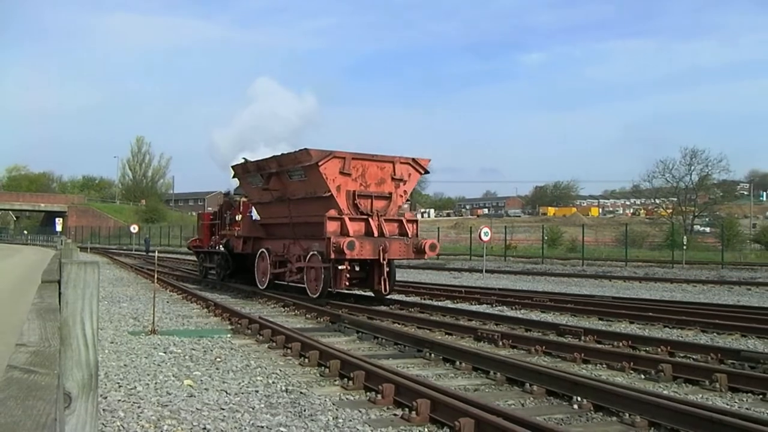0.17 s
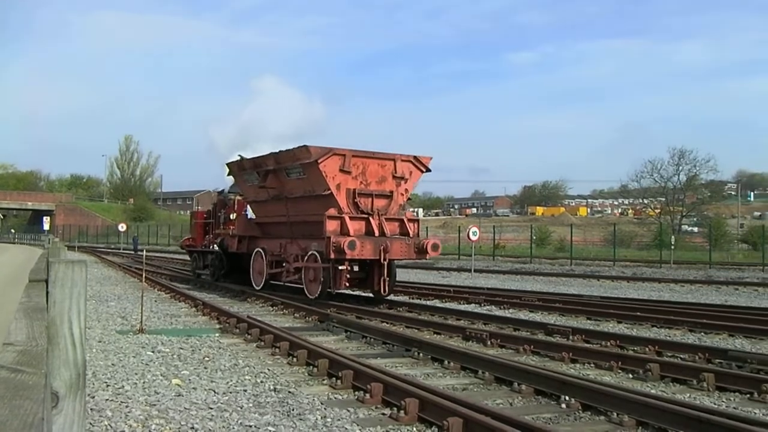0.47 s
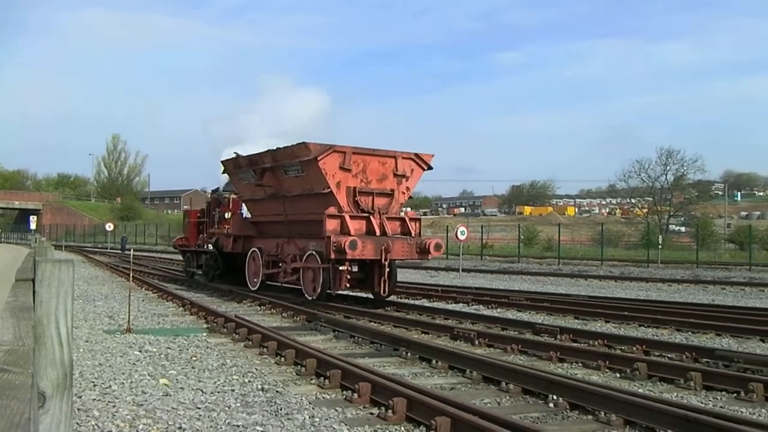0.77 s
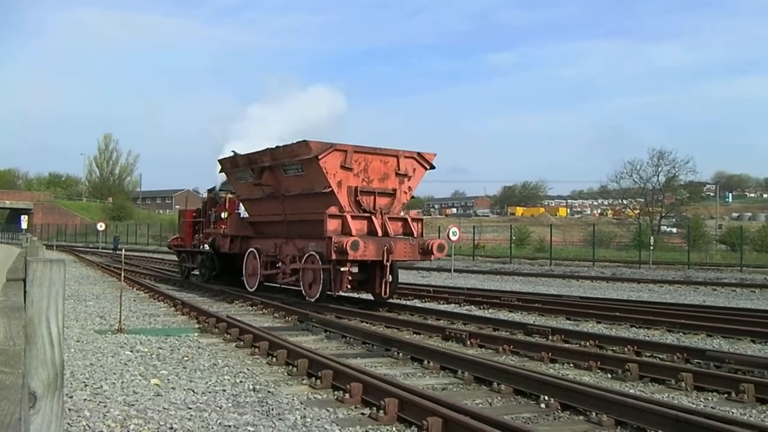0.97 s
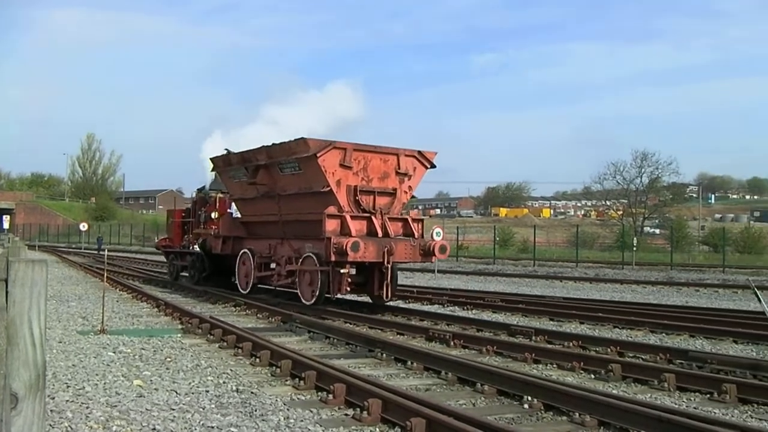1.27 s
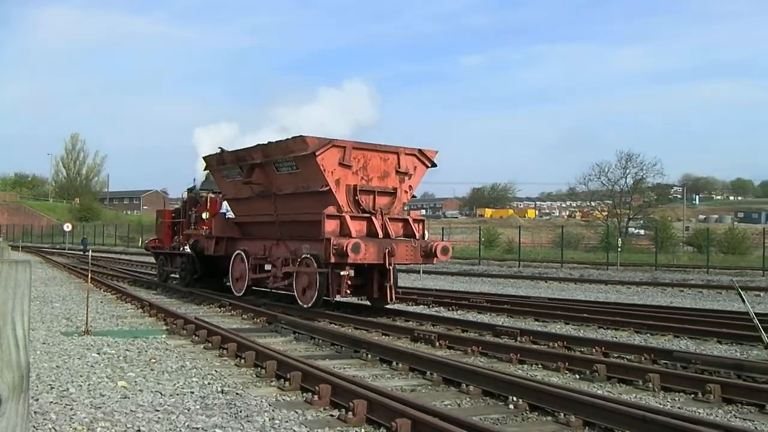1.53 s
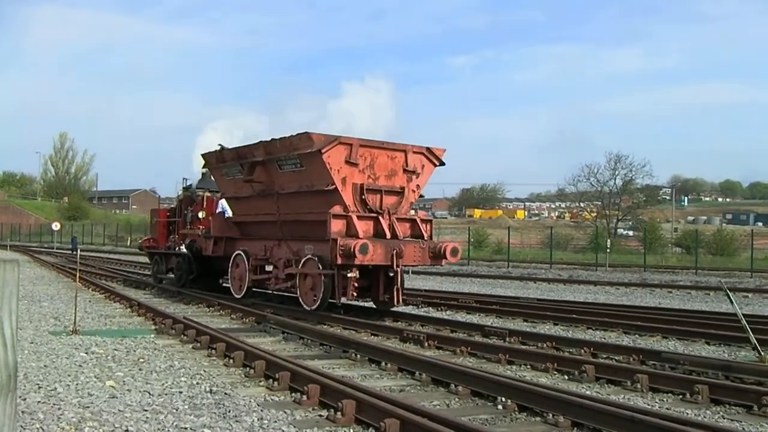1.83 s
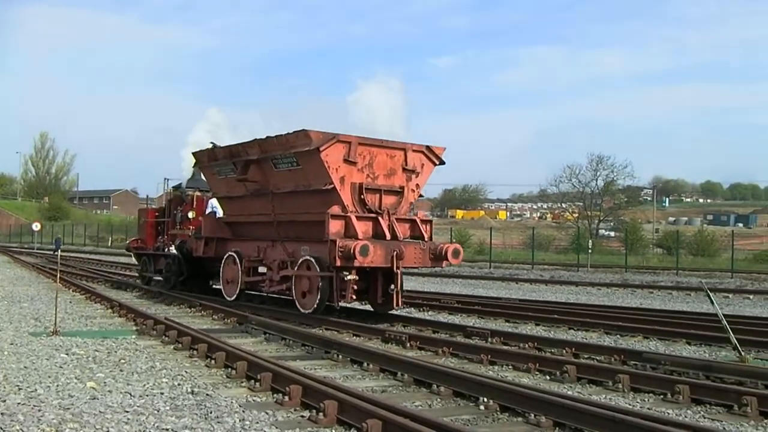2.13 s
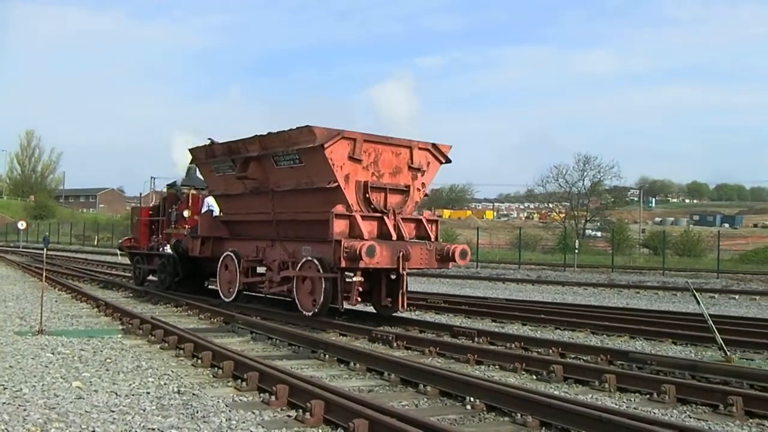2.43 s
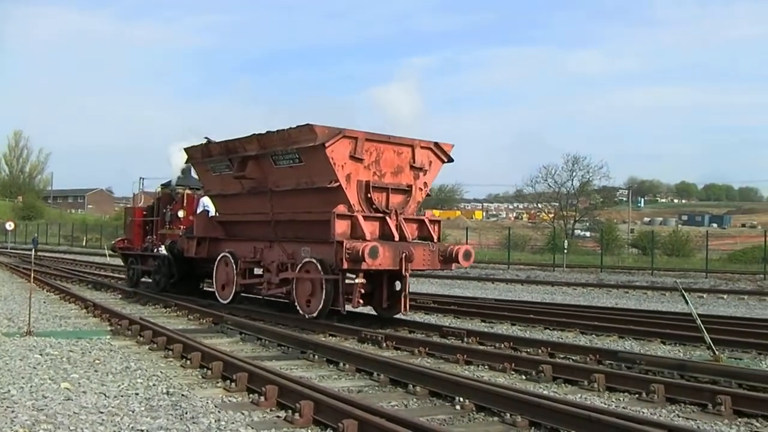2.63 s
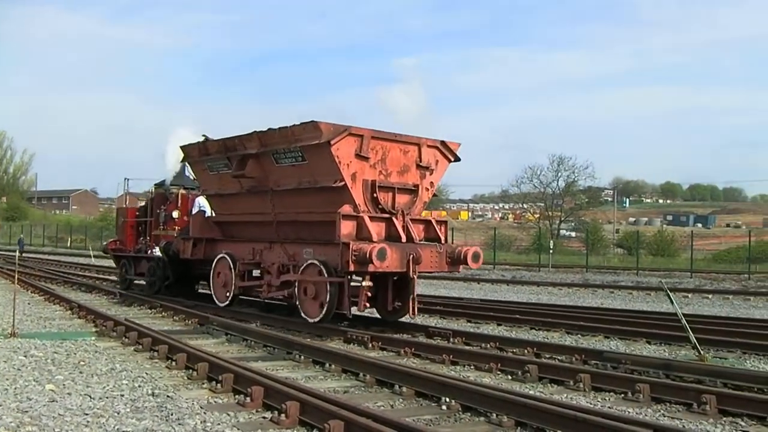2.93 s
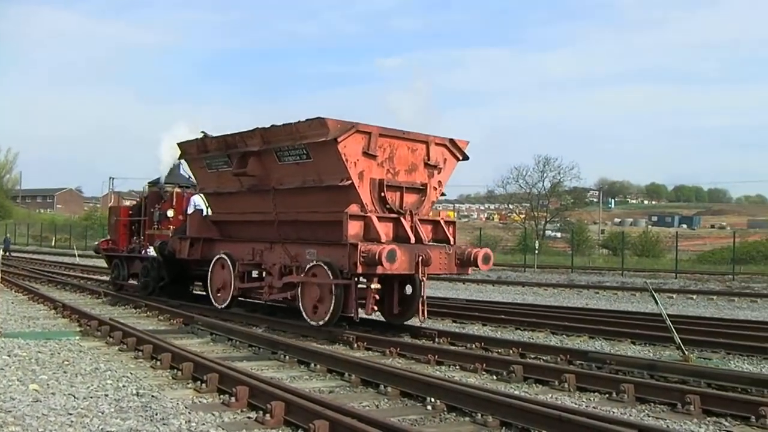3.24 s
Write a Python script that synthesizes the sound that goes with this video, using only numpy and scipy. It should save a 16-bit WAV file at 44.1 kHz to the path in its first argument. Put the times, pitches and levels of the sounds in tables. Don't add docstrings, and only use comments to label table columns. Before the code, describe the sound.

A small steam locomotive hisses throughout, a crisp high jet over a breathy, slightly whistling leak. The jet starts restrained, surges around 1.1-1.3 and 1.6-1.9 seconds, eases, then lifts near 2.7 and at the end. Beneath, wagon wheels rumble softly, with dull, quickly damped metal knocks near 0.5, 0.8, 1.2, 2.1-2.3 and 3.1-3.3. Open yard, close stereo; a faint early breeze fades after 1.2.

```python
import sys
import numpy as np
from scipy import signal
from scipy.fft import rfft, irfft
from scipy.io import wavfile
from scipy.ndimage import uniform_filter1d

SR = 44100
rng = np.random.default_rng(int(sys.argv[2]) if len(sys.argv) > 2 else 0)


def unload_audio(sound):
    columns = np.transpose(np.atleast_2d(sound))
    steps = np.round(np.clip(columns, -1, 1) * 32767)
    wavfile.write(sys.argv[1], SR, steps.astype(np.int16))


def invert_db(x):
    u = np.asarray(x, float) / 20
    return 10 ** u


N = 149940
HZ = np.maximum(np.arange(N // 2 + 1) * SR / N, 1)
RIDGE_WIDTH_HZ = 383


def rms_one(x):
    return x / np.sqrt(np.mean(x ** 2) + 1e-20)


def in_time(rows):
    s, *columns = np.transpose(rows)
    return [np.interp(np.arange(N) / SR, s, c) for c in columns]


def at_hz(points):
    hz, *columns = np.transpose(points)
    return [np.interp(np.log(HZ), np.log(hz), c) for c in columns]


def noise_pair():
    return rng.standard_normal((2, N))


def drift(rate_hz):
    step, settle = 40, 2000
    r = np.exp(-2 * np.pi * rate_hz * step / SR)
    chance = rng.standard_normal(N // step + settle + 2)
    slow = signal.lfilter([1], [1, -2 * r, r * r], chance)[settle:]
    return np.interp(np.arange(N) / step, np.arange(len(slow)), rms_one(slow))


def resonate(x, hz, width_hz):
    r = np.exp(-np.pi * width_hz / SR)
    poles = [1, -2 * r * np.cos(2 * np.pi * hz / SR), r * r]
    for _ in range(2):
        x = signal.lfilter([1, 0, -1], poles, x)
    return rms_one(x)


def turbulence(colour, together_db, patchy_db, rate, count):
    low, high = colour[0][0], colour[-1][0]
    place = (count - 1) * np.log(HZ / low) / np.log(high / low)
    spectrum = rfft(noise_pair()) * invert_db(at_hz(colour)[0])
    shared_db = together_db * (drift(2.5) + drift(26))
    total = np.zeros((2, N))
    for k in range(count):
        band = irfft(spectrum * np.clip(1 - abs(place - k), 0, 1), N)
        own_db = patchy_db * (drift(rate) + drift(rate / 5))
        total += invert_db(shared_db + own_db) * band
    return rms_one(total)


def ridge(hz, width_hz):
    low_pass = signal.butter(4, width_hz / 2, fs=SR, output="sos")
    slow = signal.sosfilt(low_pass, rng.standard_normal((2, 2, N)))
    turn = 2 * np.pi * np.cumsum(hz) / SR
    band = slow[0] * np.cos(turn) + slow[1] * np.sin(turn)
    return rms_one(band) * invert_db(0.52 * drift(11.0))


# time in seconds, jet level in dB, brightness at the top in dB.
VALVE_PRESSURE = [(0.0, -30.5, -6), (0.14, -34.5, -6), (0.25, -31.5, -4), (0.43, -29.5, -3),
                  (0.69, -32, -3), (0.89, -33.5, -6), (1.11, -25, -5), (1.32, -22.5, -9), (1.36, -27.5, -8),
                  (1.5, -28.5, -8), (1.57, -22, -6.5), (1.92, -22.5, -11), (2.08, -29.5, -2),
                  (2.57, -26.5, -7), (2.67, -24, -9), (2.9, -27.5, -2.5), (3.08, -28.5, -7.5),
                  (3.4, -23, -5.5)]
# frequency in Hz, spectral density in dB per Hz.
JET_COLOUR = [(5000, -22), (7400, -12.5), (8300, -4.5), (9100, -0.5), (9700, 0.5), (10800, 0),
              (12200, -3.5), (13600, -11)]
# frequency in Hz, spectral density in dB per Hz.
FIZZ_COLOUR = [(11800, -16), (13400, -7), (14200, 0), (15000, -2), (15800, -2), (18000, -2.5)]
# starting frequency in Hz, level relative to the jet in dB.
JET_BANDS = [(9250, -14), (10400, -12.5), (11200, -10.5)]


def valve():
    db, top_db = in_time(VALVE_PRESSURE)
    sink = 1 - 0.04 * np.arange(N) / N
    jet = turbulence(JET_COLOUR, together_db=0.72, patchy_db=1.0, rate=17.0, count=9)
    for hz, under_db in JET_BANDS:
        jet += invert_db(under_db + 3.8 * drift(1.1)) * ridge(hz * sink, RIDGE_WIDTH_HZ)
    fizz = turbulence(FIZZ_COLOUR, together_db=-0.15, patchy_db=1.4, rate=12, count=4)
    return invert_db(db + 1.0) * (jet + invert_db(top_db + 4.5) * fizz)


# time in seconds, level in dB, upper ridge in Hz, then the levels
# of the upper, lower, middle and top ridges in dB over the leak.
LEAK_FLOW = [(0, -31.5, 3944, -12, -12, -11, -26), (.3, -31, 4000, -16, -9, -9.5, -20),
             (.5, -32, 4000, -11, -13, -21, -20), (.68, -30.5, 4030, -8, -7, -17, -24),
             (.95, -31, 4060, -8, -8, -18, -29), (1.25, -28, 4037, -3, -7, -10, -7),
             (1.45, -29, 4010, -2, -7, -13, -11), (1.6, -26.5, 4030, -6.5, -8.5, -9, -16),
             (1.72, -31.5, 4020, -3, -6.5, -13, -11), (1.95, -30, 4010, -3.5, -3, -13, -20),
             (2.3, -29.5, 3960, -6.5, -5.5, -16, -26), (2.6, -30.5, 3925, -5, -4, -5.5, -11),
             (2.82, -28, 3886, -3, -3, -7, -11), (3.04, -28.5, 3794, -12, -3, -13, -21),
             (3.25, -28, 3755, -8, -5.5, -9.5, -6.5), (3.4, -26.5, 3756, -11, -10, -7, -7)]
# frequency in Hz, spectral density in dB per Hz.
LEAK_COLOUR = [(900, -16), (1500, -6), (2200, -3), (3200, -4.5), (4400, -5.5), (5200, -5), (6200, -3),
               (7600, -11.5)]


def leak():
    db, upper_hz, upper_db, lower_db, middle_db, top_db = in_time(LEAK_FLOW)
    lower_hz = 2731 * (upper_hz / upper_hz[0]) ** 0.6
    still = np.ones(N)
    hiss = turbulence(LEAK_COLOUR, together_db=0.44, patchy_db=0.5, rate=8.2, count=9)
    hiss += invert_db(upper_db) * ridge(upper_hz, RIDGE_WIDTH_HZ)
    hiss += invert_db(lower_db) * ridge(lower_hz, width_hz=496)
    hiss += invert_db(middle_db) * ridge(3500 * still, width_hz=300)
    hiss += invert_db(top_db) * ridge(4454 * still, RIDGE_WIDTH_HZ)
    return invert_db(db) * hiss


# time in seconds, level in dB, low hum over that level in dB.
ROLLING_LEVEL = [(0.0, -41, -6), (0.25, -42.5, -5.5), (0.45, -42, -8), (0.52, -38, 0), (0.62, -39, -8),
                 (0.74, -39, -6), (0.86, -43.5, 1), (1.05, -42, -4), (1.25, -41, -7), (1.5, -40, -12),
                 (1.72, -44.5, -11), (1.88, -43, -6), (2.05, -42, -5), (2.25, -37.5, -8.5),
                 (2.62, -42.5, -14), (2.75, -41.5, -0.5), (3.2, -40.5, -9.5), (3.4, -38.5, -8)]
# frequency in Hz, spectral density in dB per Hz.
RUMBLE_COLOUR = [(15, -45), (35, -32), (56, -7), (91, 0), (247, -7.5), (370, -2.5), (501, -5), (613, -2.5),
                 (817, -6), (1400, -13), (1820, -38), (3080, -120)]
# frequency in Hz, width in Hz, level over the rumble in dB.
BODY_MODES = [
    (370, 56, -10.5),
    (700, 110, -22),
]


def rolling():
    db, low_db = in_time(ROLLING_LEVEL)
    sound = turbulence(RUMBLE_COLOUR, together_db=0.44, patchy_db=0.27, rate=7.8, count=8)
    for hz, width_hz, mode_db in BODY_MODES:
        sound += invert_db(mode_db + 2.5 * drift(9.4)) * resonate(noise_pair(), hz, width_hz)
    sound += invert_db(low_db) * resonate(noise_pair(), hz=86, width_hz=24)
    return invert_db(db) * sound


# time in seconds, level in dB.
BREEZE_LEVEL = [
    (0, -55),
    (.3, -56),
    (.6, -54),
    (1.15, -52),
    (1.3, -71),
    (2.7, -66),
    (3.4, -58),
]


def breeze():
    db, = in_time(BREEZE_LEVEL)
    band = signal.butter(4, [40, 62], "band", fs=SR, output="sos")
    both, own = signal.sosfilt(band, noise_pair())
    return invert_db(db + 2.5 * drift(5.0)) * rms_one(both + 0.3 * own * [[1], [-1]])


# time in seconds, level in dB.
SCATTER_LEVEL = [
    (0, -54),
    (1.0, -52),
    (1.7, -60),
    (2.1, -68),
    (3.4, -68),
]


def scatter():
    db, = in_time(SCATTER_LEVEL)
    band = signal.butter(2, [5400, 6800], "band", fs=SR, output="sos")
    return invert_db(db + 3.0 * drift(6.0)) * rms_one(signal.sosfilt(band, noise_pair()))


def burst(t, length, tail):
    return np.clip(t / 0.0025, 0, 1) * np.exp(-np.maximum(t - length, 0) / tail)


# start in seconds, level in dB, top frequency in Hz, length in seconds.
JOINT_KNOCKS = [(0.486, -34.5, 1700, 0.033), (.668, -36.5, 1100, 0.03), (0.798, -33, 2000, 0.044),
                (1.162, -30.5, 1390, 0.039), (2.069, -35, 1200, 0.051), (2.172, -32.5, 700, 0.043),
                (2.284, -33, 1300, 0.018), (2.702, -35.5, 1502, 0.031), (2.882, -34, 1700, 0.014),
                (3.14, -31, 1800, 0.014), (3.325, -37.5, 899, 0.039)]


def joint_knocks():
    t, out = np.arange(SR // 5) / SR, np.zeros((2, N + SR))
    for s, db, top_hz, length in JOINT_KNOCKS:
        band = signal.butter(1, [170, top_hz], "band", fs=SR, output="sos")
        shudder = rms_one(signal.sosfilt(band, rng.standard_normal((2, len(t)))))
        start = int(s * SR)
        out[:, start:start + len(t)] += invert_db(db) * shudder * burst(t, length, tail=0.015)
    return out[:, :N]


# start in seconds, level in dB, pitch in Hz, length in seconds.
METAL_NOTES = [(0.491, -26, 129, 0.015), (0.499, -31.5, 364, 0.019), (0.58, -31.5, 114, 0.013),
               (0.677, -43, 396, 0.028), (0.798, -36, 1305, 0.01), (0.811, -40.5, 400, 0.048),
               (1.094, -35, 148, 0.011), (1.162, -32, 730, 0.033), (1.168, -35.5, 429, 0.055),
               (1.182, -34.5, 105, 0.023), (1.186, -37, 970, 0.036), (1.17, -41, 1158, 0.038),
               (1.486, -41, 400.4, 0.028), (1.574, -36, 634, .025), (1.667, -43, 977, 0.07),
               (1.779, -42, 1080, 0.057), (1.73, -42, 1500, 0.069), (1.846, -37, 980, 0.01),
               (1.843, -34.5, 1540, 0.039), (2.07, -31, 655, 0.019), (2.085, -34, 736, 0.014),
               (2.177, -29.5, 380, 0.0091), (1.609, -36, 100, .015), (2.188, -26.5, 150, 0.0075),
               (2.285, -35, 370, 0.019), (2.356, -37, 377, 0.02), (2.705, -43, 328, 0.0089),
               (2.919, -42.5, 371.3, 0.028), (3.047, -38, 364, 0.01), (3.145, -37.5, 335.4, .012),
               (3.319, -31.5, 372, 0.02), (3.363, -40, 100, 0.02)]


def metal_notes():
    t, out = np.arange(SR // 5) / SR, np.zeros((2, N + SR))
    for s, db, hz, length in METAL_NOTES:
        wobble = rms_one(uniform_filter1d(rng.standard_normal((2, len(t))), size=300))
        moving_hz = hz + 0.036 * np.sqrt(400 * hz) * wobble
        turn = 2 * np.pi * np.cumsum(moving_hz, axis=1) / SR + [[0], [np.pi / 2]]
        start = int(s * SR)
        out[:, start:start + len(t)] += invert_db(db + 1.0) * np.sin(turn) * burst(t, length, tail=0.0084)
    return out[:, :N]


# frequency in Hz, left-right balance in dB, likeness from 0 to 1, right phase in radians.
PORT_RESPONSE = [(100, -0.7, 0.99, -.1), (300, -1.5, 0.95, -0.14), (600, -0.4, 0.9, 0.2), (1500, 0, 1, 0.37),
                 (2100, -2.5, 0.86, 0), (2930, -7, 0.9, 0.3), (4000, -5, 0.85, -.6), (4500, -8, 0.7, -1.2),
                 (5260, -9, 0.7, -2.5),
                 (5700, -1, .86, -3.05), (6000, 0, .86, -3.14), (6350, .5, .82, -3.3),
                 (7230, 3, 0.75, -5), (7800, 4, 0.4, -5), (8900, 4, 0.96, -6), (10600, 4.5, 0.68, -5.5),
              (11800, 6, 0.7, -6), (12400, -1.5, 0, -6.5), (14000, 10, 0.6, -11.5), (15000, 6, .6, -11.8),
                 (15700, 6, .74, -11.9)]


def ports(sound):
    direct, scattered = rfft(sound)
    balance_db, alike, turn = at_hz(PORT_RESPONSE)
    alike = np.clip(alike, 0, 0.985)
    right = alike * direct * np.exp(1j * turn) + np.sqrt(1 - alike ** 2) * scattered
    return irfft(np.array([direct * invert_db(balance_db / 2), right * invert_db(-balance_db / 2)]), N)


def scene():
    engine_and_wagon = valve() + leak() + rolling() + joint_knocks() + metal_notes()
    return ports(engine_and_wagon) + breeze() + scatter()


def band_limit(x):
    return signal.sosfilt(signal.butter(12, 15750, fs=SR, output="sos"), x)


def record(dry):
    split_hz, split_width_hz, split_db, cutoff_hz = 7860, 75, -17, 15750
    dip_db = split_db * np.exp(-((HZ - split_hz) / split_width_hz) ** 2)
    gain = invert_db(dip_db) * (HZ < cutoff_hz)
    mix = irfft(rfft(dry) * gain, N)
    return band_limit(mix)


dry = scene()
out = record(dry)
unload_audio(out)
```